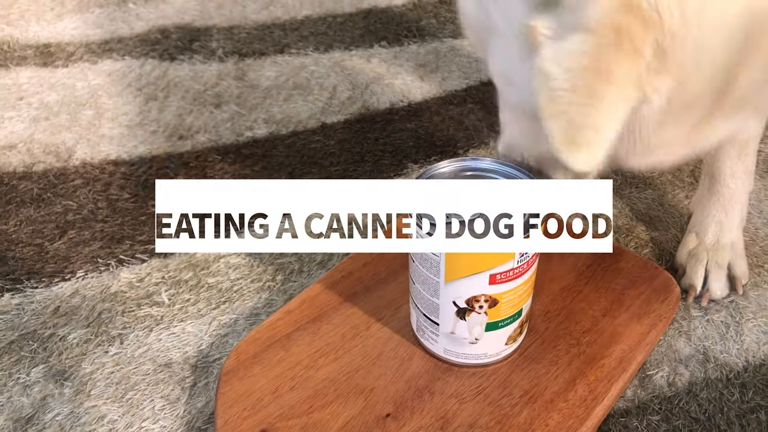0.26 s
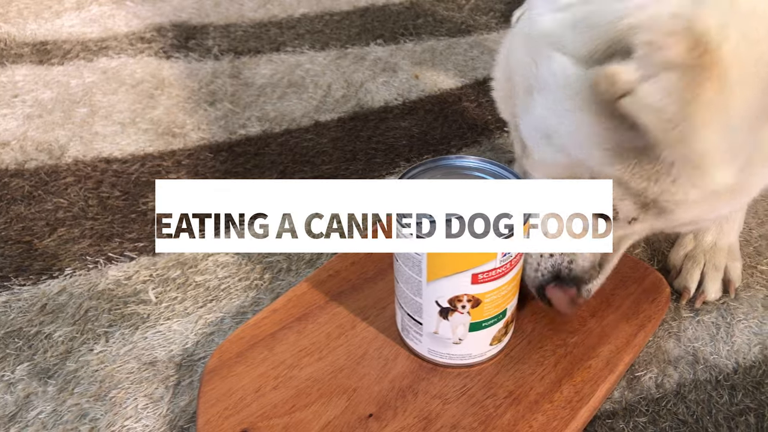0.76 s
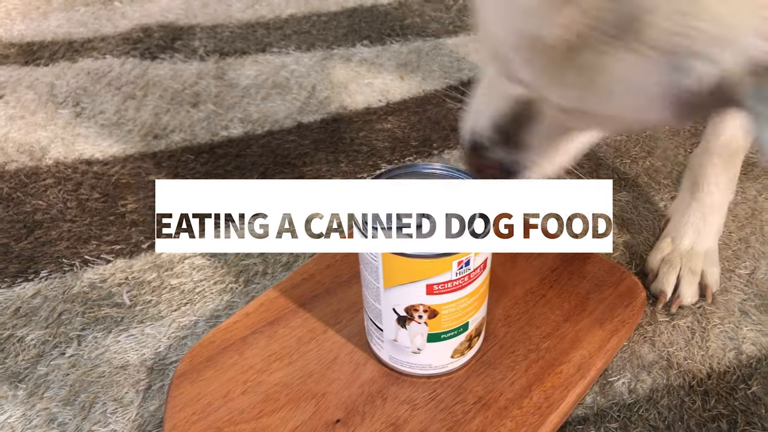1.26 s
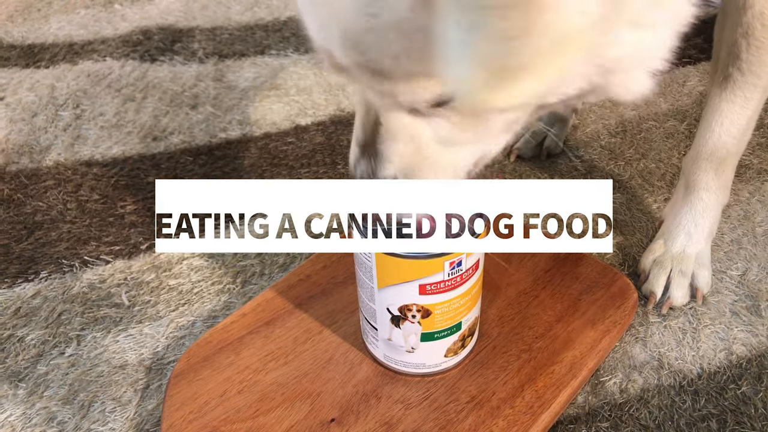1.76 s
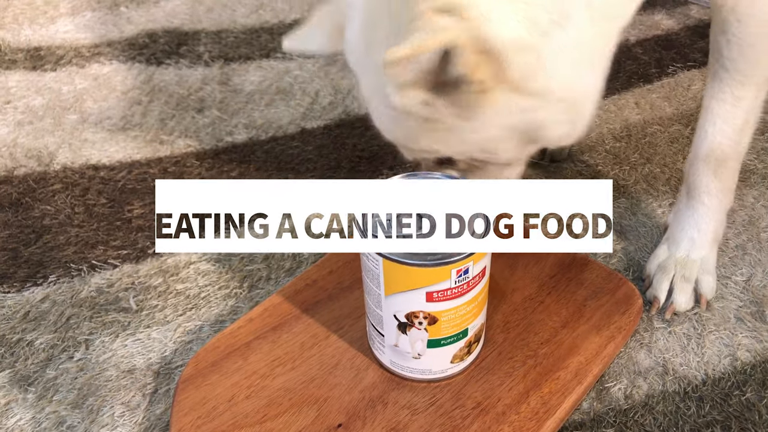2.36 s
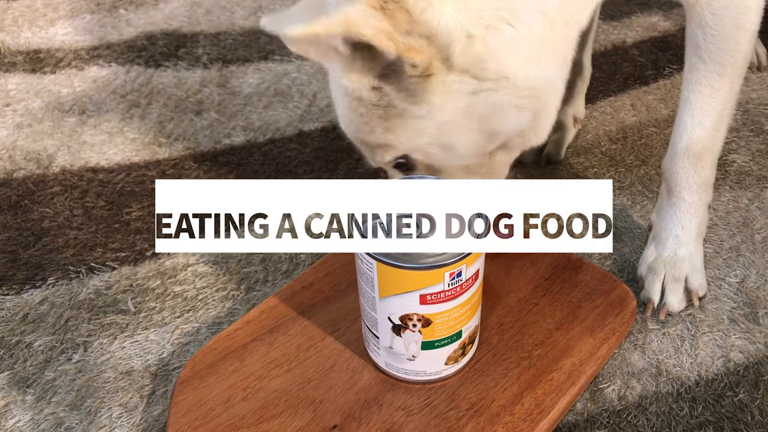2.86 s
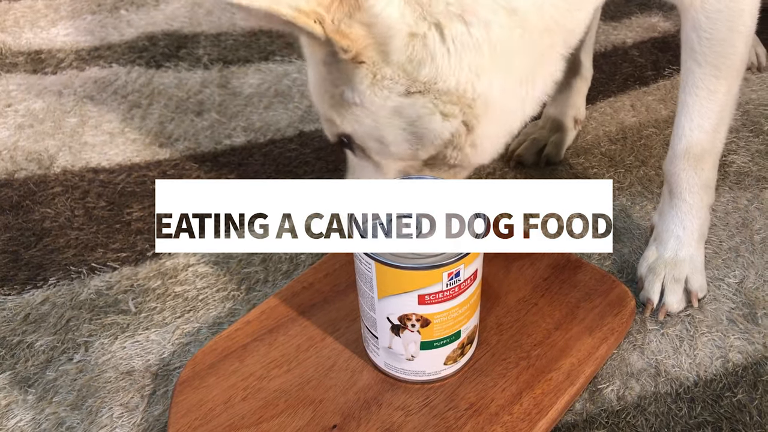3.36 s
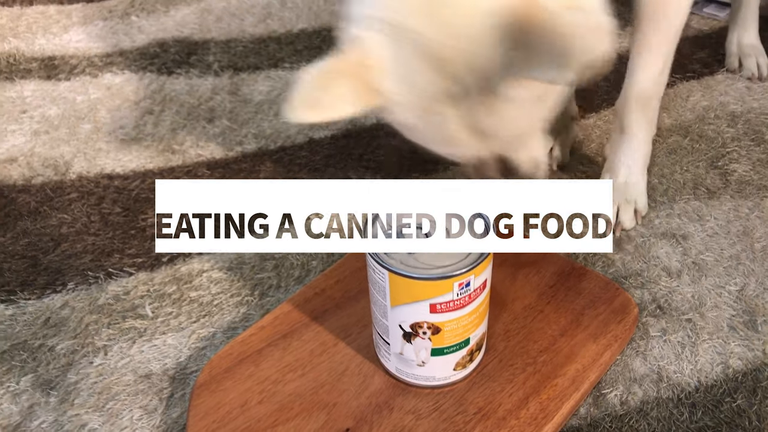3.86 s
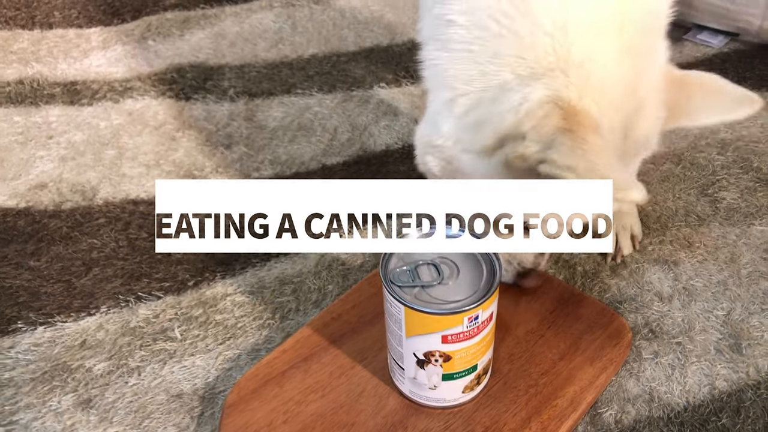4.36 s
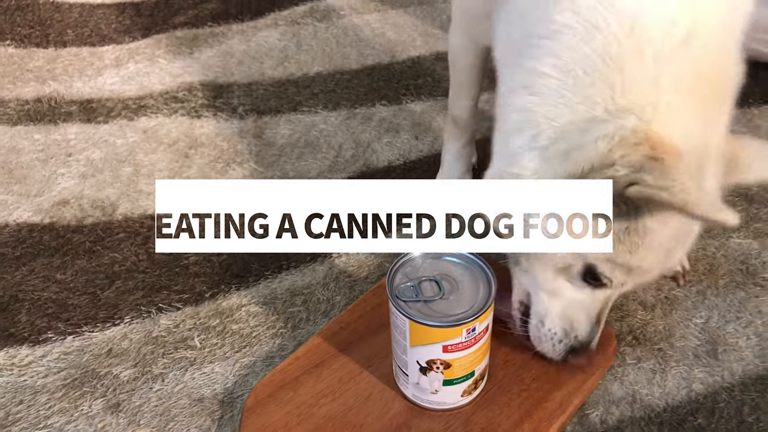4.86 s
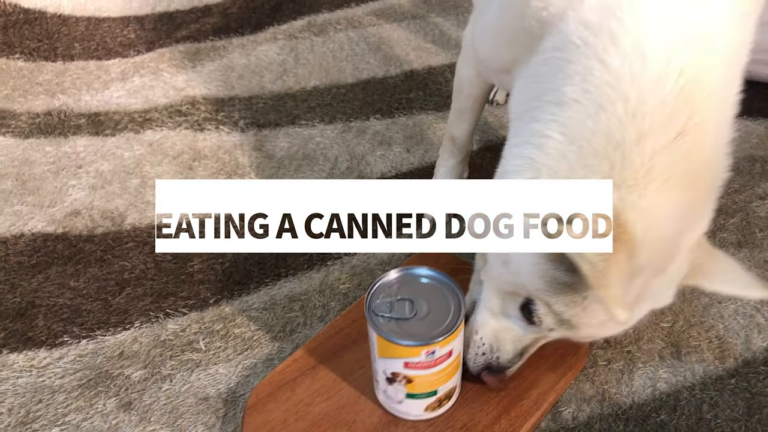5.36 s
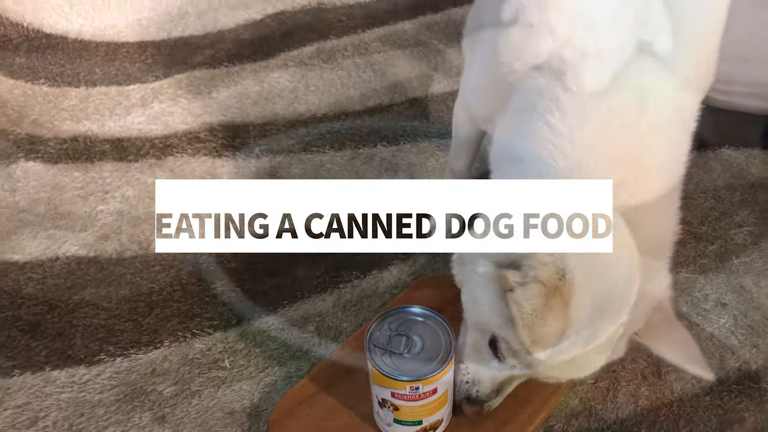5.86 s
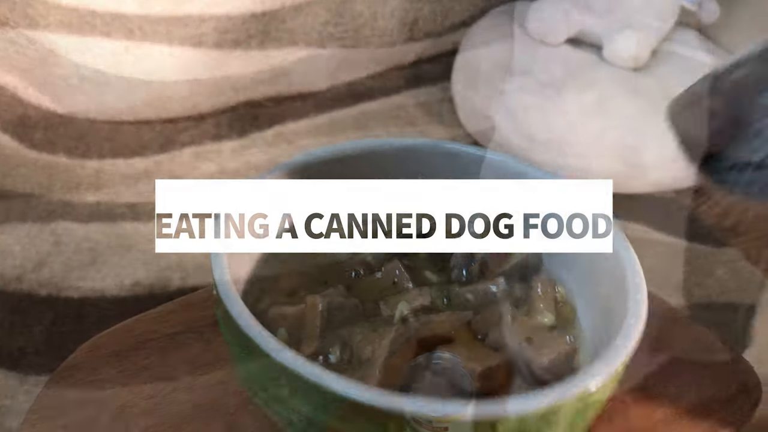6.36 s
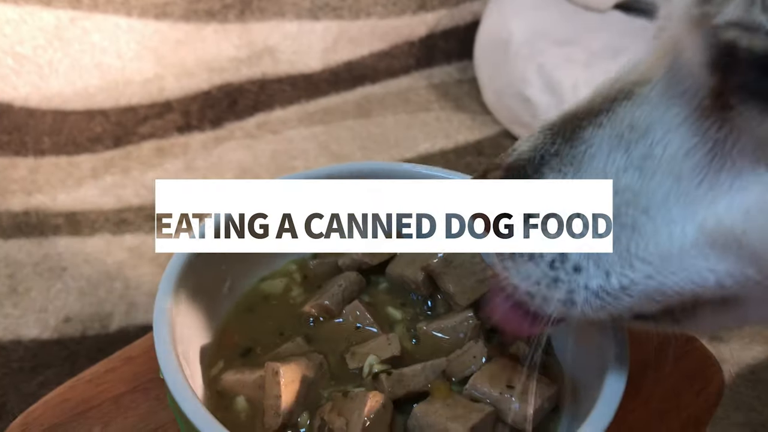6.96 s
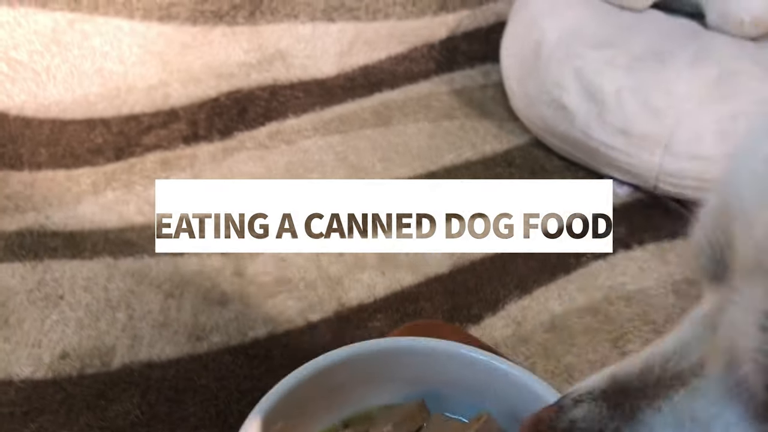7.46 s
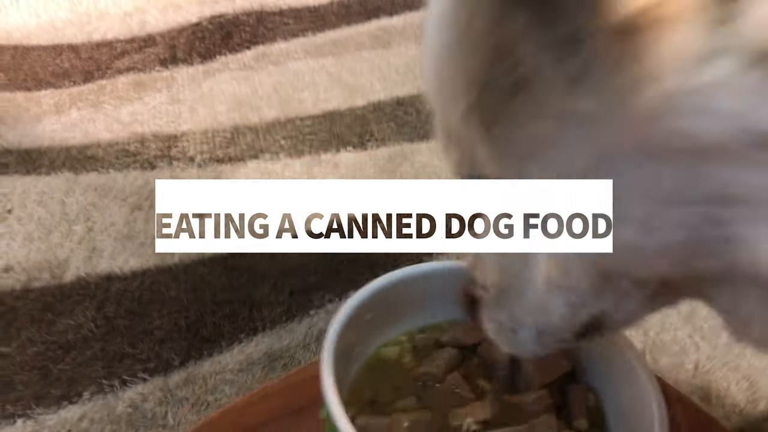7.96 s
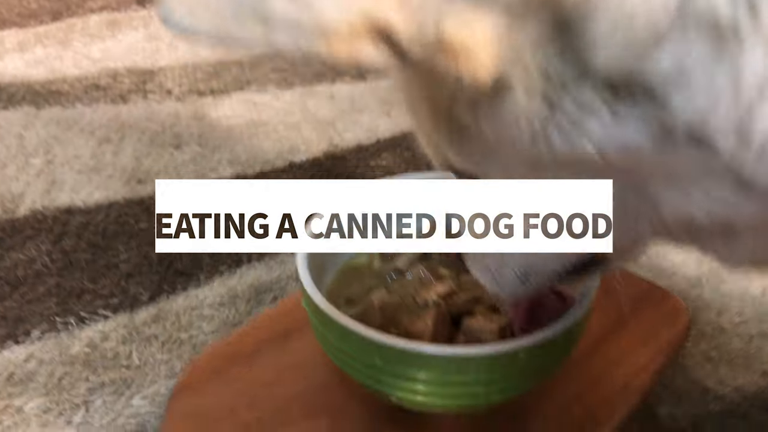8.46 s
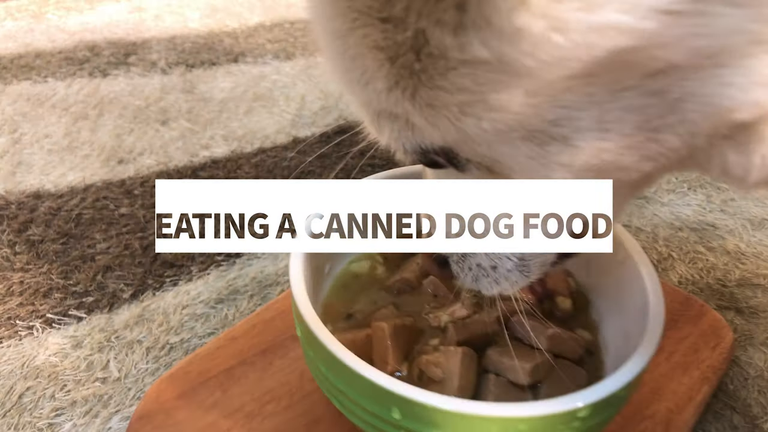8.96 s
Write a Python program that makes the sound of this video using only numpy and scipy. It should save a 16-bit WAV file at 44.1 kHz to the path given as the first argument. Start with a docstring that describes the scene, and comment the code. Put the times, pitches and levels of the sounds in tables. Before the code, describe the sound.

For the first six seconds the sound is quiet and mono: a small carpeted room with soft air and a faint wavering mains hum. A dog sniffs a closed can in irregular short puffs, hissy and nasal, stronger near 1.2, 3.4 and 4.4 s. Small clear tongue ticks appear singly, clustering around 4.2-4.7 s; a low bump falls at 1.2 s, dull rubbing at 3.4-4 s, more soft thuds until 5.3 s. From about 5.8 s it fades into a close, much louder stereo bowl. Wet squelch, gurgle and fine fizz flutter with each lap, surging at 6.4 s. Crisp jaw smacks land at 5.9, 6.2, 6.4, 6.9, 7.5, 7.8 and 8.1 s, with splashes and short ceramic ringing. A longer sniff passes near 8 s. Gulps and dense lip clicks continue, with sharp wet pops around 8.95 s, and eating carries on to the end at 9.2 s.

```python
"""A dog sniffs and licks round a closed can in a carpeted room: mains tones and room air, noise ringing
nasal resonances, short ringing bursts for tongue ticks, thuds and rubs. All of this is mono.
The sound then fades over to a close view of its bowl: flickering bands of crackle squelch and fizz in gravy,
gulps, jaw smacks and lip clicks ring small cavities, the bowl and its rim, and a few sniffs return.
The bowl is in stereo, and its squelch and fizz widen towards the treble."""
import sys
import numpy as np
from scipy import signal
from scipy.io import wavfile

SR = 44100
rng = np.random.default_rng(int(sys.argv[2]) if len(sys.argv) > 2 else 0)


def unload_audio(sound):
    """Save the sound as a 16-bit wav file, at the path given as the first command line argument."""
    columns = np.transpose(np.atleast_2d(sound))
    # keep every value between -1 and 1, then stretch to whole-number steps
    steps = np.round(np.clip(columns, -1, 1) * 32767)
    wavfile.write(sys.argv[1], SR, steps.astype(np.int16))


N = 406161


def amp(db):
    """dB to gain."""
    return 10 ** (np.asarray(db) / 20)


def rms_one(x):
    """Scale to unit rms."""
    return x / np.sqrt(np.mean(x ** 2) + 1e-20)


def in_time(rows):
    """Columns of a table, sample by sample; -90 outside its span, which makes a level inaudible."""
    s, *columns = np.transpose(rows)
    return [np.interp(np.arange(N) / SR, s, c, left=-90, right=-90) for c in columns]


def at_hz(points, hz):
    """Read a spectrum on a log-frequency axis."""
    points = np.array(points)
    return np.interp(np.log(hz), np.log(points[:, 0]), points[:, 1])


def drift(rate_hz):
    """Slow smoothed chance of unit rms, made at every 40th sample and joined by lines."""
    r = np.exp(-80 * np.pi * rate_hz / SR)
    noise = rng.standard_normal(N // 40 + 2002)
    slow = signal.lfilter([1], [1, -2 * r, r * r], noise)[2000:]   # skip the filter's start
    return np.interp(np.arange(N) / 40, np.arange(len(slow)), rms_one(slow))


def resonate(x, hz, width_hz):
    """One two-pole resonance with gain near 1 on top."""
    r = np.exp(-np.pi * width_hz / SR)
    poles = [1, -2 * r * np.cos(2 * np.pi * hz / SR), r * r]
    return signal.lfilter([(1 - r * r) / 2, 0, (r * r - 1) / 2], poles, x)


def cavities(x, modes, shift_db=0):
    """Parallel resonances, signs alternating; with shift_db each swells and fades on its own; rms 1."""
    total = 0
    for k, (hz, width_hz, db) in enumerate(modes):
        swell_db = shift_db * drift(7) if shift_db else 0
        total = total + (-1) ** k * amp(db + swell_db) * resonate(x, hz, width_hz)
    return rms_one(total)


def crackle(per_s, spread_db, share, channels=1):
    """Noise with a share of its power in random clicks of uneven size."""
    size = (channels, N)
    loudness_db = spread_db * np.minimum(rng.exponential(1, N), 3.5)
    clicks = (rng.random(N) < per_s / SR) * amp(loudness_db)
    clicks = clicks * rng.choice([-1, 1], size)
    share = np.clip(share, 0, 1)
    return np.sqrt(share) * rms_one(clicks) + np.sqrt(1 - share) * rng.standard_normal(size)


def coloured(spectrum, source, patchy_db, flicker_hz):
    """Third-octave bands of a (mid, side) source, each with its level, flicker and likeness; rms 1."""
    # how alike left and right are: (frequency [Hz], likeness [0 to 1])
    likeness = [(150, 0.18), (400, 0.87), (1000, 0.87), (2400, 0.98), (7000, 0.18), (15000, 0.13)]
    bottom, top = spectrum[0][0], spectrum[-1][0]
    edges = np.geomspace(bottom, top, round(3 * np.log2(top / bottom)) + 1)
    out = 0
    for k, (low, high) in enumerate(zip(edges, edges[1:])):
        band = signal.butter(2, [low, high], "band", fs=SR, output="sos")
        mid, side = signal.sosfilt(band, source) * (-1) ** k
        centre = np.sqrt(low * high)
        alike = np.clip(at_hz(likeness, centre), 0, 1)
        gain = amp(at_hz(spectrum, centre) + patchy_db * drift(flicker_hz))
        out = out + gain * (np.sqrt(1 + alike) * mid + np.sqrt(1 - alike) * side * [[1], [-1]])
    return rms_one(out)


def pop(hz, cycles, burst_s, wide, apart=0):
    """A ragged burst, at most half a second, rings a small cavity, with shares of broad and side crack."""
    t = np.arange(round((.02 + 7 * burst_s) * SR)) / SR
    mid, side = rng.standard_normal((2, SR // 2))[:, :len(t)] * np.exp(-t[:SR // 2] / burst_s)
    mid[0] = 4   # the film breaks all at once
    ring = rms_one(resonate(resonate(mid, hz, hz / cycles), hz, 2 * hz / cycles))
    broad = rms_one(resonate(resonate(mid, hz, 1.5 * hz), hz, 1.5 * hz))
    sides = rms_one(resonate(side, 6500, 9000)) * [[1], [-1]]
    # scale from rms towards peak, by how much of the span the burst and ring fill
    level = np.sqrt((burst_s + cycles / hz / np.pi) / t[-1] / 8)
    return rms_one(ring + wide * broad + apart * sides) * level


def add(track, s, sound):
    """Mix a sound in at time s."""
    i = round(s * SR)
    track[..., i:i + sound.shape[-1]] += sound[..., :N - i]


def strokes(rows, rise_db, sag_db, fall_db_per_s):
    """Each row climbs to its peak, sags over its hold, then falls; powers add. One gain per level column."""
    t, power = np.arange(0, N + 32, 32) / SR, 1e-12
    for s, rise, hold, *db in rows:
        since = t - s
        climb = rise_db * since / rise
        sag = -sag_db * np.minimum(since / hold, 1)
        fall = fall_db_per_s * np.maximum(since - hold, 0)
        shape_db = np.where(since < 0, climb, sag - fall)
        power = power + amp(np.array(db)[:, None] + shape_db) ** 2
    return [np.interp(np.arange(N) / SR, t, np.sqrt(p)) for p in power]


def wet_ticks(effort, per_s, level_db, low_hz, cycles, apart):
    """Small films snap at random, each at its own pitch and size, following the effort at that moment."""
    out = np.zeros((2, N))
    for when, pitch, size in rng.random((round(per_s * N / SR), 3)):
        db = level_db - 3 * np.log(np.maximum(size, .05))   # level_db is the smallest, a few are larger
        snap = pop(low_hz * 4.5 ** pitch, cycles, burst_s=.75 / low_hz, wide=apart / 2, apart=apart)
        add(out, when * N / SR, amp(db) * snap)
    return effort * out


def hum():
    """Two mains lines that waver in level and a little in phase, fading as the place changes."""
    # lower line, near 50 Hz: (time [s], level [dB])
    low_rows = [(0.0, -62), (0.29, -55), (0.58, -62), (1.92, -56), (1.99, -62), (2.5, -52.5), (2.71, -65),
                (2.97, -53.5), (3.39, -65.5), (3.64, -57.5), (5.96, -58.5), (6.14, -66), (6.5, -82),
                (9.21, -80)]
    # upper line, near 100 Hz: (time [s], level [dB])
    high_rows = [(0, -69.5), (5.9, -68), (6.5, -74.5), (9.21, -72.5)]
    turn = 2 * np.pi * np.arange(N) / SR
    low = np.sin(50 * turn + .5 * drift(0.57))
    high = np.sin(99.8 * turn + 0.36 * drift(1.3))
    return np.sqrt(2) * (amp(in_time(low_rows)[0]) * low + amp(in_time(high_rows)[0]) * high)


def room_air():
    """Banded noise, a faint motor band near 120 Hz, and at the bowl a rumble that differs between the ears."""
    # colour of the air: (frequency [Hz], relative level per Hz [dB])
    spectrum = [(15, -45), (25, -6), (64, -7), (117, -14), (161, -16.5), (489, -28.5), (3620, -37),
                (4870, -45.5), (5430, -38.5), (10400, -43), (12900, -37), (16000, -65)]
    bowl_from_s = 5.86
    air = coloured(spectrum, rng.standard_normal(N) * [[1], [0]], patchy_db=1.8, flicker_hz=12.0)[0]
    motor = rms_one(resonate(rng.standard_normal(N), 120.7, 1.8))
    fade_in = np.clip(np.arange(N) / SR - bowl_from_s, 0, .5) * 2   # over half a second
    rumble = rms_one(resonate(rng.standard_normal(N), 90, 180)) * fade_in
    return amp(-66) * air + amp(-73.0) * motor + amp(-73.5) * rumble * [[1], [-1]]


def sniffing():
    """Air rushes through the nasal passages, whose colour shifts, and past the nostril edges."""
    # sniffs: (peak time [s], rise [s], hold [s], nasal hiss level [dB], nostril treble level [dB])
    sniffs = [(0.0, .01, 0.083, -62, -74), (.21, 0.024, 0.061, -67, -64), (.65, 0.039, 0.076, -65.5, -71),
              (.8, 0.042, 0.12, -61.5, -62), (.92, 0.14, 0.044, -66.5, -57), (1.0, 0.017, 0.033, -67, -62),
              (1.1, 0.049, 0.06, -62.5, -75), (1.21, 0.11, 0.082, -59.5, -62.5),
              (1.54, 0.016, 0.1, -66.5, -67.5), (1.69, 0.0087, 0.17, -67.5, -70),
              (2.09, 0.045, 0.0081, -73, -68), (2.33, 0.016, .03, -80, -76), (2.48, 0.035, 0.038, -66, -65),
              (2.68, 0.12, 0.16, -64, -66.5), (2.86, 0.035, 0.03, -68.5, -65.5),
              (2.99, 0.063, 0.13, -60.5, -61.5), (3.26, 0.035, 0.048, -65.5, -66.5),
              (3.39, 0.029, 0.062, -56, -56), (3.62, 0.26, 0.12, -60.5, -69.5),
              (3.885, 0.015, 0.13, -68.5, -69), (4.25, 0.08, 0.089, -64.5, -69),
              (4.37, 0.033, 0.14, -57, -59.5), (4.6, 0.04, 0.28, -66.5, -73),
              (4.78, 0.034, 0.2, -62.5, -59), (5.06, 0.021, 0.036, -65.5, -66),
              (5.2, 0.081, 0.025, -69.5, -72.5), (5.37, 0.08, 0.07, -61, -62.5),
              (5.58, 0.039, 0.002, -66, -62.5), (5.76, 0.24, 0.21, -65.5, -67.5),
              (7.99, 0.28, 0.066, -53.5, -76), (9.03, 0.036, 0.2, -67, -86)]
    # resonances of the nasal passages: (frequency [Hz], width [Hz], relative level [dB])
    nose = [(990, 480, 1.5), (1990, 164, 5.5), (2894, 1250, 3), (3740, 660, 7), (4445, 190, 2),
            (5390, 310, 0), (6360, 930, -5)]
    # resonances at the nostril edges: (frequency [Hz], width [Hz], relative level [dB])
    nostril = [(8770, 1300, 1), (12100, 1300, 4.5), (16000, 1700, -8)]
    # faint double whistle in the nose: (time [s], upper pitch [Hz], mean level of the upper tone [dB])
    whistle_rows = [(5.86, 9200, -86), (5.97, 10850, -82), (6.05, 10100, -79), (6.17, 9250, -82)]
    hiss, treble = strokes(sniffs, rise_db=14, sag_db=7, fall_db_per_s=188)
    nasal = cavities(crackle(600, 3, .1)[0], nose, shift_db=3.2)
    edge = cavities(crackle(600, 3, .1)[0], nostril, shift_db=1.5)
    # broad rush between the resonances
    leak = amp(-11.5) * rms_one(resonate(rng.standard_normal(N), 5000, 5000))
    hz, whistle_db = in_time(whistle_rows)
    turn = 2 * np.pi * np.cumsum(hz) / SR
    whistle = amp(whistle_db + 3 * drift(20)) * (np.sin(turn) + .5 * np.sin(.82 * turn))
    # tiny ticks of the wet nose
    ticks = wet_ticks(hiss, per_s=14, level_db=9, low_hz=1900, cycles=2.7, apart=0)
    return hiss * (nasal + leak) + treble * edge + whistle + ticks


def round_the_can():
    """Moist tongue ticks ring clearly; paws, nose and fur thud and rub in longer, duller bursts."""
    # tongue ticks by the can: (time [s], approximate peak [dB], pitch [Hz])
    licks = [(0.6394, -41, 3040), (1.3367, -51.5, 1950), (1.534, -41, 5400), (2.055, -53, 3770),
             (2.078, -49, 6400), (2.466, -48.5, 3150), (3.176, -54, 2730), (3.2118, -50, 3300),
             (3.7316, -47, 2360), (4.194, -47, 2520), (4.218, -51, 11500), (4.2546, -44, 3030),
             (4.344, -49, 6350), (4.413, -40.5, 3550), (4.566, -53, 2800), (4.603, -54, 4500),
             (4.685, -41.5, 3380), (5.16, -45.5, 3140)]
    # bumps and rubs on board and carpet: (time [s], nominal level [dB], pitch [Hz], burst decay time [s])
    thuds = [(1.233, -42.5, 102, 0.035), (1.229, -57, 875, 0.094), (1.58, -62, 330, 0.0087),
             (1.662, -63, 267, 0.014), (1.664, -55.5, 736, 0.014), (2.456, -60, 670, 0.039),
             (3.192, -55.5, 744, 0.028), (3.244, -58.5, 985, 0.038), (3.41, -57, 310, 0.67),
             (3.52, -54.5, 820, 0.73), (4.203, -63, 342, 0.058), (4.278, -52.5, 161, 0.056),
             (4.715, -57.5, 950, 0.23), (5.068, -51, 188, 0.067), (5.113, -53.5, 508, 0.042),
             (5.308, -55, 164.6, 0.039)]
    out = np.zeros((2, N))
    for s, db, hz in licks:
        add(out, s, amp(db) * pop(hz, cycles=5, burst_s=.0015, wide=.15))
    for s, db, hz, decay_s in thuds:
        add(out, s, amp(db) * pop(hz, cycles=1.4, burst_s=decay_s, wide=.02))
    return out


def gravy():
    """Chunks and gravy worked by the tongue: squelch, gurgles in the mouth, and a fine fizz."""
    # laps of the tongue: (peak time [s], rise [s], hold [s], squelch level [dB], gurgle level [dB],
    # fizz level [dB])
    laps = [(5.75, 0.3, 0.23, -65, -67, -75), (6.05, 0.44, 0.34, -62.5, -62.5, -64),
            (6.3, 0.23, 0.19, -56.5, -52, -57.5), (6.44, 0.018, 0.029, -43, -42, -46),
            (6.6, 0.093, 0.023, -55, -49.5, -56), (6.69, 0.094, 0.033, -53.5, -55, -55),
            (6.83, 0.48, 0.25, -53.5, -50, -54), (7.28, 0.71, 0.15, -56, -49.5, -53.5),
            (7.43, 0.045, 0.22, -49.5, -47.5, -51), (7.72, 0.063, 0.015, -49, -50.5, -49.5),
            (7.82, 0.09, 0.12, -52.5, -48.5, -55), (7.99, 0.15, 0.17, -52.5, -51.5, -53.5),
            (8.24, 0.072, 0.049, -61, -55.5, -61.5), (8.35, 0.033, 0.1, -53.5, -47.5, -58.5),
            (8.57, 0.17, 0.031, -56.5, -46, -58), (8.66, 0.074, 0.069, -54.5, -52, -61.5),
            (8.83, 0.036, 0.032, -57, -54, -57.5), (8.95, 0.051, 0.013, -51.5, -46.5, -52.5),
            (9.01, 0.03, 0.0077, -44, -53, -48.5), (9.12, 0.1, 0.071, -52.5, -51, -51.5)]
    # colour of the squelch: (frequency [Hz], relative level per Hz [dB])
    squelch_colour = [(1200, -41), (1500, -5), (2300, -1), (3200, -2.5), (4200, -7), (6500, -10)]
    # colour of the fizz: (frequency [Hz], relative level per Hz [dB])
    fizz_colour = [(5500, 9), (6800, -7.5), (8500, -6.5), (12500, -10.5), (16500, 1)]
    # resonances of the gravy in the mouth: (frequency [Hz], width [Hz], relative level [dB])
    mouth = [(187, 54, -7), (326, 220, 2.5), (503, 130, 5.5), (780, 730, 4)]
    pressing, sloshing, frothing = strokes(laps, rise_db=26, sag_db=6, fall_db_per_s=128)
    squelch = coloured(squelch_colour, crackle(350, 4.5, 0.4, channels=2), patchy_db=3.3, flicker_hz=13)
    mid, side = crackle(250, 3, 0.35, channels=2)
    soft = signal.lfilter(*signal.butter(2, 1500, fs=SR), mid + .12 * side * [[1], [-1]])
    gurgle = sum(amp(db + 1.8 * drift(10.5)) * resonate(soft, hz, width_hz) for hz, width_hz, db in mouth)
    fizz = coloured(fizz_colour, crackle(120, 4.5, .2, channels=2), patchy_db=2, flicker_hz=20)
    ticks = wet_ticks(pressing, per_s=120, level_db=8, low_hz=1500, cycles=2.2, apart=0.4)
    # air pockets burst in the gravy
    bubbles = wet_ticks(sloshing, per_s=40, level_db=4, low_hz=253, cycles=6.6, apart=.03)
    # the food sticks and lets go, so squelch and fizz flutter together
    sticky = amp(2.0 * drift(30))
    return sticky * (pressing * squelch + frothing * fizz) + sloshing * rms_one(gurgle) + ticks + bubbles


def gulps_and_lip_clicks():
    """Gulps of gravy ring round; films of saliva snap as lips and tongue peel, each a little to one side."""
    # rounded gulps in the mouth: (time [s], approximate peak [dB], pitch [Hz], burst decay time [s])
    gulps = [(5.93, -44, 513, 0.061), (6.293, -28, 368, 0.0023), (6.672, -40.5, 880, 0.002),
             (6.694, -46.5, 2450, 0.015), (6.774, -37, 810, 0.0043), (6.827, -34, 3820, 0.007),
             (7.013, -43, 970, 0.089), (7.451, -35, 4240, 0.009), (7.721, -31, 4400, 0.0094),
             (8.344, -39.5, 1910, 0.0054), (8.368, -35.5, 2000, 0.01), (8.434, -38.5, 290, 0.0043),
             (8.523, -39.5, 1210, 0.13), (8.557, -42, 1140, 0.019), (8.672, -40, 2370, 0.0061),
             (8.698, -43, 1470, 0.0061), (8.822, -36, 387, 0.0061), (8.939, -27.5, 1100, 0.0021),
             (8.949, -31, 1260, 0.0019), (9.002, -39, 1260, 0.05), (9.108, -30.5, 412, 0.0037),
             (9.178, -41.5, 925, 0.0035)]
    # lips and tongue peel apart: (time [s], approximate peak [dB], pitch [Hz])
    clicks = [(6.332, -33.5, 11400), (6.383, -32, 2300), (6.6579, -25.5, 5200), (6.676, -40, 7210),
              (6.6848, -35, 7460), (6.965, -47, 12000), (6.972, -41, 3360), (7.0516, -36, 6160),
              (7.108, -45, 14500), (7.167, -33, 3380), (7.186, -34.5, 3460), (7.201, -36.5, 6040),
              (7.2097, -39, 13300), (7.3017, -33, 4860), (7.318, -38, 5960), (7.329, -38, 7000),
              (7.43, -27, 4520), (7.6405, -46, 7000), (7.716, -35, 5500), (7.7238, -26, 5900),
              (7.856, -29, 4100), (8.1787, -40, 6450), (8.236, -38, 6700), (8.367, -34, 6800),
              (8.387, -36, 6600), (8.395, -28, 3060), (8.412, -46, 2400), (8.435, -40, 2840),
              (8.4491, -44, 9300), (8.475, -37.5, 2520), (8.5295, -39, 1720), (8.5694, -37.5, 6400),
              (8.646, -32, 1810), (8.665, -38, 5530), (8.6763, -36.5, 2500), (8.717, -43, 5940),
              (8.73, -32, 7200), (8.756, -39, 12100), (8.8213, -37.5, 3480), (8.8418, -40.5, 6120),
              (8.95, -41, 4550), (8.966, -29, 4600), (8.972, -31, 1920), (9.0083, -33, 6400),
              (9.138, -46, 8180)]
    out = np.zeros((2, N))
    for s, db, hz, decay_s in gulps:
        add(out, s, amp(db) * pop(hz, cycles=5.1, burst_s=decay_s, wide=0.061, apart=.03))
    for s, db, hz in clicks:
        pan_db = rng.normal(1, 3)   # left over right
        gains = amp(db + pan_db * np.array([[.5], [-.5]]))
        add(out, s, gains * pop(hz, cycles=4, burst_s=.0007, wide=.55, apart=.4))
    return out


def smacks():
    """Each jaw slap: a crack, a knock that rings the bowl, and a grainy dying splash that sets the rim singing."""
    # jaws slap shut on the food: (time [s], approximate crack peak [dB], crack pitch [Hz],
    # crack ring [cycles], bowl knock level [dB], splash pitch [Hz], splash level [dB], 60 dB fall time [s])
    slaps = [(5.931, -22.5, 2830, 7.7, -66.5, 3230, -43, 0.28),
             (6.2188, -18, 3540, 1.3, -50.5, 2620, -35, 0.26),
             (6.4355, -15.5, 6500, 4.4, -46, 4870, -34.5, 0.19),
             (6.891, -12, 3670, 4, -46.5, 3800, -43, 0.23),
             (7.5044, -18, 3500, 2.3, -43, 2500, -29.5, 0.22),
             (7.8316, -12, 4160, 15.3, -61, 4080, -47, 0.23),
             (8.117, -21.5, 3250, 1.8, -62, 2900, -46, 0.11)]
    # resonances of bowl and board: (frequency [Hz], width [Hz], relative level [dB])
    bowl = [(133, 44, -8), (228.6, 30.5, 0.5), (347, 55, 5), (427, 28.5, 9), (566, 81, -5), (742, 14.5, -3),
            (985, 64, -8.5)]
    # modes of the ceramic rim: (frequency [Hz])
    rim_modes = [1900, 2300, 2850, 3100, 3750, 4040, 4470]
    rim_width_hz, rim_db = 60, -1
    out, t = np.zeros((2, N)), np.arange(round(.4 * SR)) / SR
    wet = crackle(1000, 3.5, .35, channels=2)
    for s, db, hz, cycles, knock_db, splash_hz, splash_db, t60 in slaps:
        i = round(s * SR)
        mid, side = wet[:, i:i + len(t)]
        fall = amp(-60 * t / t60)
        splash = rms_one(resonate(resonate(mid, splash_hz, splash_hz * 0.56), splash_hz, splash_hz * 1.4))
        rim = 0
        for mode_hz in rim_modes:   # each slap strikes the modes a little differently
            strength = amp(rng.normal(0, 3))
            rim = rim + strength * resonate(splash, mode_hz * rng.normal(1, .015), rim_width_hz)
        splash = rms_one(splash + amp(rim_db) * rim)
        spray = 0.64 * resonate(side, 3500, 4900) * [[1], [-1]]   # fine droplets differ between the ears
        blow = (1 + 7 * np.exp(-t / 0.0012)) * fall ** 0.45   # a hard first touch, then food sliding
        knock = cavities(rng.standard_normal(len(t)) * blow, bowl)
        add(out, s, amp(db) * pop(hz, cycles, burst_s=.0005, wide=.6, apart=.15))
        add(out, s, amp(splash_db) * fall * (splash + spray))
        add(out, s, amp(knock_db) * knock)
    return out


def off_the_wall(x):
    """The wall of the bowl throws sounds back as one close echo."""
    echo_s, echo_db = .0012, -7
    lag = round(echo_s * SR)
    return x + amp(echo_db) * np.pad(x, ((0, 0), (lag, 0)))[:, :N]


def scene():
    """The mono room by the can, then the stereo bowl."""
    by_the_can = hum() + room_air() + sniffing() + round_the_can()
    at_the_bowl = gravy() + off_the_wall(gulps_and_lip_clicks() + smacks())
    return by_the_can + at_the_bowl


def record(dry):
    """A steep low-pass cuts the top above about 16 kHz."""
    return signal.sosfilt(signal.cheby2(16, 70, 16300, fs=SR, output="sos"), dry)


dry = scene()
out = record(dry)
unload_audio(out)
```